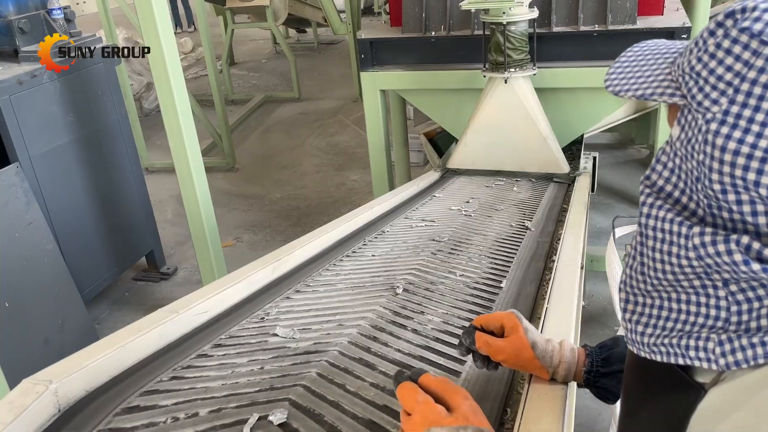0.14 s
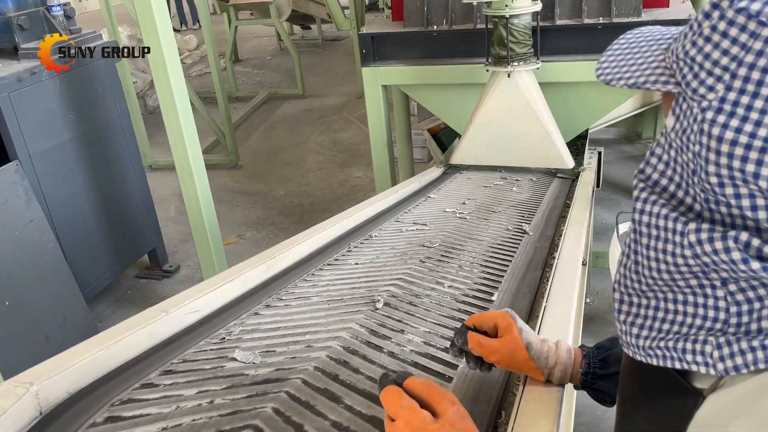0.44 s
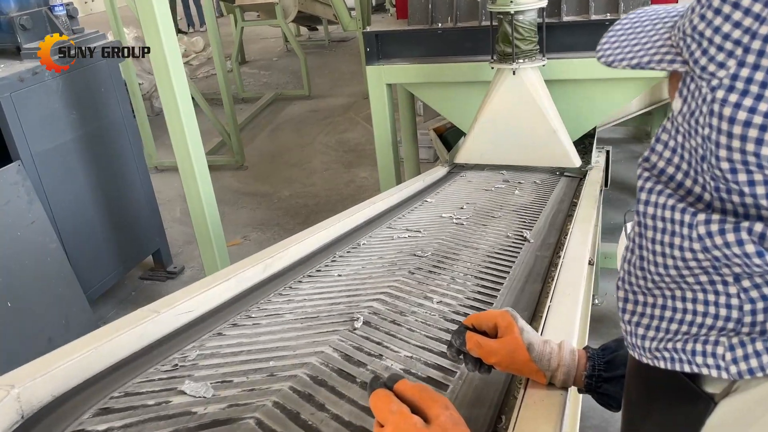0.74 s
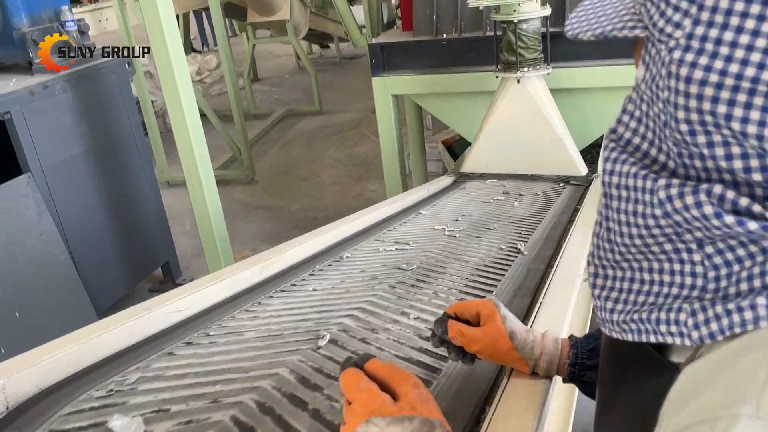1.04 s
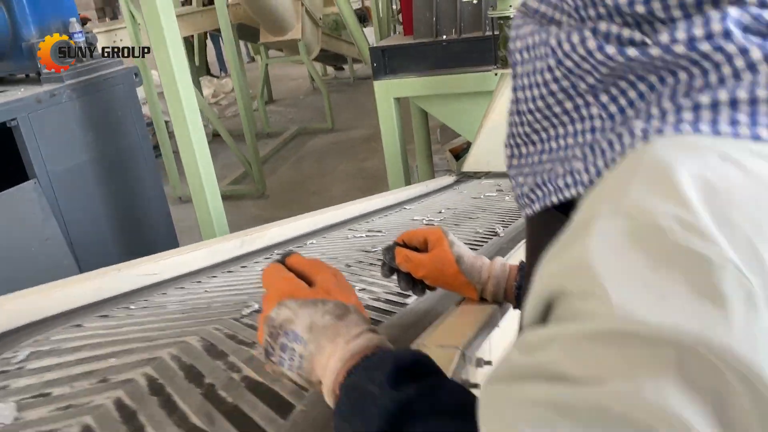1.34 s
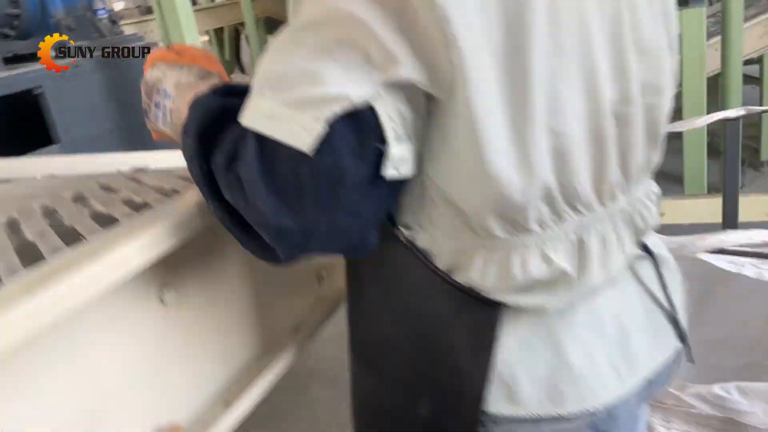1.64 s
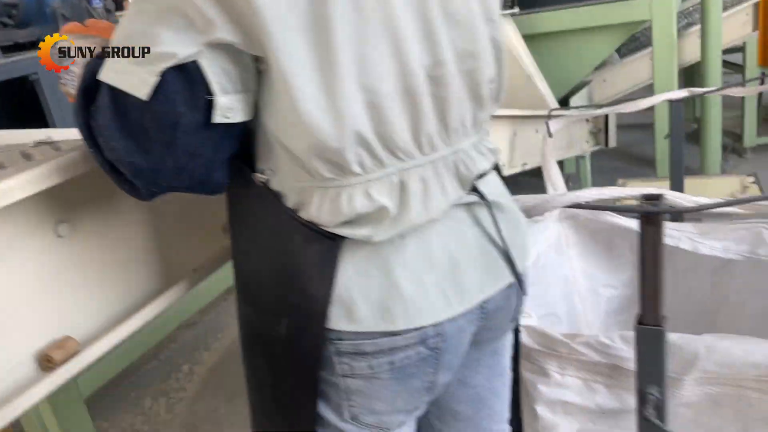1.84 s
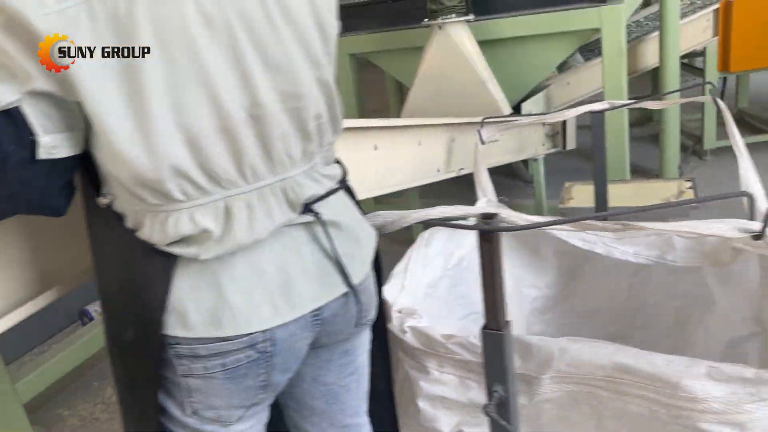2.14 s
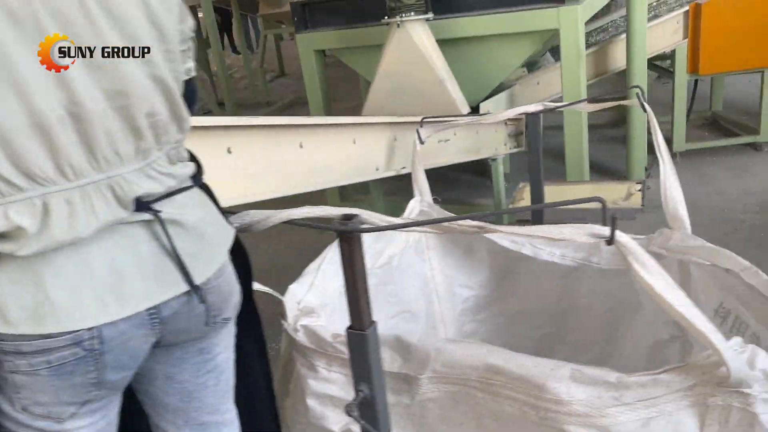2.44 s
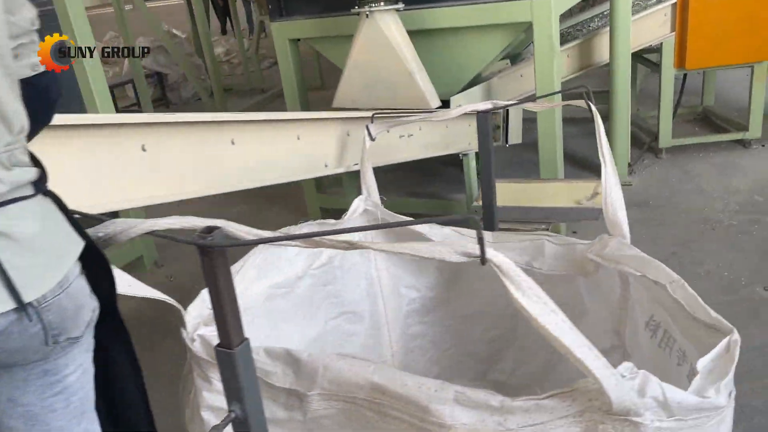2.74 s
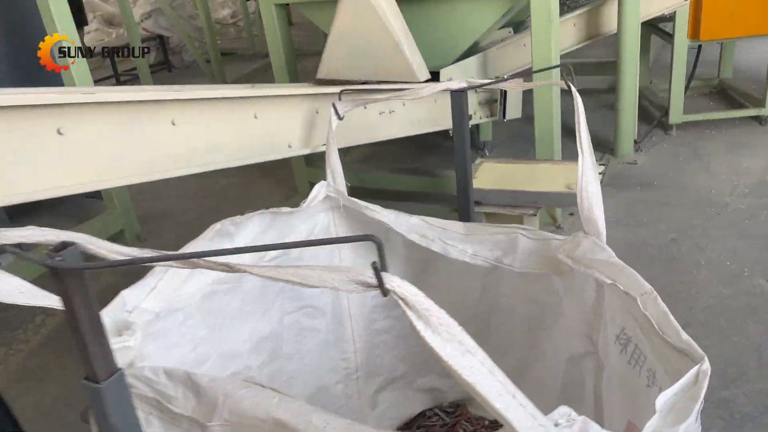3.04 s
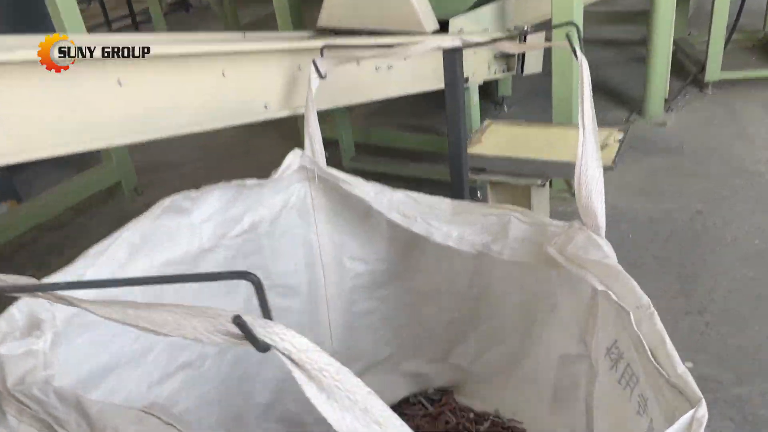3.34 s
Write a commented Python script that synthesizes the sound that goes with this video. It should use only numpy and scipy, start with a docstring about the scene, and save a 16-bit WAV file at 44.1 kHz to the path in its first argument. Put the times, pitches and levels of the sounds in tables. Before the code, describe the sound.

Shredded metal scrap clatters continuously in uneven bursts several times a second, with thin ringing clanks, over roaring fans and humming motors in a large industrial hall, heard in stereo by a nearby handheld microphone.

```python
"""Shredded scrap spills down steel chutes a few times a second: random hits excite short resonances.
Heavier chunks ring on at thin pitches; single clangs are decaying sines.
Behind them fans, belts and motors of a recycling hall roar (flickering coloured noise) and hum (narrow noise).
Two microphone ports share part of the sound, with a phase lead and level tilt set by frequency."""
import sys
import numpy as np
from scipy import signal
from scipy.fft import rfft, irfft
from scipy.io import wavfile

SR = 44100
rng = np.random.default_rng(int(sys.argv[2]) if len(sys.argv) > 2 else 0)


def store_pcm(level_fs):
    """Save levels as 16-bit WAV."""
    pcm = np.round(np.clip(level_fs, -1, 1) * 32767).astype(np.int16)
    wavfile.write(sys.argv[1], SR, np.atleast_2d(pcm).T)


N = 154350


def from_db(db):
    """Amplitude gain of a level in dB."""
    return 10 ** (np.asarray(db) / 20)


def rms_one(x):
    """Scale to unit power."""
    return x / np.sqrt(np.mean(x ** 2) + 1e-20)


def at_hz(points, hz):
    """Read a spectrum table, linear over log frequency."""
    table_hz, values = np.array(points).T
    return np.interp(np.log(hz + 1), np.log(table_hz), values)


def drift(corner_hz):
    """Slow random curve of spread 1: two-pole lowpassed noise, computed every 40 samples."""
    step = 40
    pole = np.exp(-2 * np.pi * corner_hz * step / SR)
    noise = rng.standard_normal(N // step + 2002)
    slow = signal.lfilter([1], [1, -2 * pole, pole ** 2], noise)[2000:]  # settled part
    return np.interp(np.arange(N) / step, np.arange(len(slow)), rms_one(slow))


def ring(x, hz, width_hz):
    """Two-pole resonance whose output power for noise is independent of its width."""
    radius, angle = np.exp(-np.pi * width_hz / SR), 2 * np.pi * hz / SR
    gain = np.sqrt(1 - radius ** 2)
    poles = [1, -2 * radius * np.cos(angle), radius ** 2]
    return signal.lfilter([gain, 0, -gain], poles, x + 1e-18)


# scrap spills: (time [s], clatter level [dB], sizzle re clatter [dB], clank re clatter [dB],
#                knock re clatter [dB], clatter rise constant [s], clatter fall T60 [s])
SPILLS = [(0.2982, -20, 3, 1.5, -5, 0.016, 0.81), (0.4394, -14.5, -2, -1, 4, 0.02, 0.57),
          (0.573, -15.5, 1, 5, 5, 0.012, 0.54), (0.6394, -22.5, 3, -6, 4, 0.044, 1),
          (0.8884, -14.5, -5, 1.5, 4, 0.018, 0.47), (0.9444, -23.5, 5, -8, 7.5, 0.022, 0.94),
          (1.075, -15, -12, 2.5, -8, 0.047, 0.95), (1.1994, -18, 2.5, -9, 6, 0.021, 0.38),
          (1.3894, -22, -3, 2, 8, 0.0098, 0.54), (1.4694, -15.5, -8, 3, -2.5, 0.056, 1),
          (1.6487, -17.5, 1, 5.5, 5.5, 0.036, 0.68), (1.7494, -19.5, -5, 2, -6, 0.013, 0.45),
          (1.9111, -14.5, -8, 4.5, -12, 0.02, 0.4), (2.1594, -17, -22, 6, 5.5, 0.056, 1),
          (2.2594, -18.5, 1, -7, -13, 0.022, 0.78), (2.3444, -21, 9.5, -12, -8, 0.015, 0.56),
          (2.492, -13, 1.5, 4, 4, 0.016, 0.58), (2.5344, -19, 3, 5, 0, 0.026, 0.94),
          (2.725, -14.5, 0.5, 2, 0.5, 0.009, 0.53), (2.7594, -23, -2, 6.5, -11, 0.032, 0.45),
          (3.021, -20.5, 2, 0, 4, 0.019, 0.85), (3.182, -14.5, 5, 2.5, -3, 0.019, 0.52),
          (3.2594, -18, -12, 3, 3, 0.013, 0.54)]
SPILL_OFFSET_DB, TRICKLE_DB = -9.5, -39  # added to every clatter level; floor that never stops
SIZZLE_HASTE, CLANK_HASTE = 3.0, 0.6  # rise speed re clatter; knock shares the clank's
CLUMP_DB, CLUMP_CORNER_HZ = 0.6, 19.0


def spill_force():
    """Strength of knock, clank, clatter, sizzle: spills rise and die away in the hall over a trickle."""
    t = np.arange(N) / SR
    power = np.full((4, N), from_db(TRICKLE_DB) ** 2)
    haste = np.array([[CLANK_HASTE], [CLANK_HASTE], [1], [SIZZLE_HASTE]])
    for start_s, clatter_db, sizzle_db, clank_db, knock_db, rise_s, t60_s in SPILLS:
        age = np.maximum(t - start_s, 0)
        zone_db = np.array([[knock_db], [clank_db], [0], [sizzle_db]])
        fall_db = 60 * age * haste ** 0.56 / t60_s
        level_db = clatter_db + SPILL_OFFSET_DB + zone_db - fall_db
        rise = 1 - np.exp(-age * haste / rise_s)
        power += (rise * from_db(level_db)) ** 2
    clumps_db = CLUMP_DB * np.array([drift(CLUMP_CORNER_HZ) for _ in power])
    return np.sqrt(power) * from_db(clumps_db)


# borders between knock, clank, clatter and sizzle: (frequency [Hz])
ZONES_HZ = [1200, 2700, 7500]
# scrap spectrum: (frequency [Hz], density [dB per Hz])
SCRAP_SPECTRUM = [(350, 3), (600, -2), (1000, 3.5), (2000, 4), (3500, 5.5), (5000, 3.5), (7000, -0.5),
                  (9500, -6), (12500, -40.5), (15500, -63)]
PIECES_PER_S, PIECE_SPREAD_DB = 20000, 2.5
PIECE_WIDTH_PER_HZ = 2.3 / 8.0  # resonance width over pitch


def scrap(force):
    """Small pieces hit at random; each rings a few cycles at one of 24 pitches. Two unrelated draws."""
    sizes_db = PIECE_SPREAD_DB * np.minimum(rng.exponential(1, (2, N)), 5)
    sizes = from_db(sizes_db) * rng.choice([-1, 1], (2, N))
    hits = rms_one((rng.random((2, N)) < PIECES_PER_S / SR) * sizes)
    pitches_hz = np.geomspace(350, 15500, 24)
    dealt = rng.integers(0, 24, (2, N))
    zones = np.searchsorted(ZONES_HZ, pitches_hz)
    out = 0
    for k, (hz, zone) in enumerate(zip(pitches_hz, zones)):
        band_db = at_hz(SCRAP_SPECTRUM, hz) + 10 * np.log10(hz / 4000)  # density to band level
        struck = force[zone] * hits * (dealt == k)
        out = out + from_db(band_db) * ring(struck, hz, PIECE_WIDTH_PER_HZ * hz)
    return out


# chunk spectrum: (frequency [Hz], gain [dB])
CHUNK_COLOUR = [(400, -6), (1000, -4.5), (1500, -2.5), (2500, -1), (4800, -1), (6000, -6)]
CHUNKS_PER_S, CHUNK_DB, CHUNK_SPREAD_DB = 600, -1, 4.2
CHUNK_WIDTH_HZ = 2.0 / 0.17


def chunks(force):
    """Heavier pieces and struck plates ring at 110 thin random pitches, in time with the spills."""
    sizes = from_db(CHUNK_SPREAD_DB * np.minimum(rng.exponential(1, (2, N)), 3))
    hits = rms_one(sizes * (rng.random((2, N)) < CHUNKS_PER_S / SR)) * from_db(CHUNK_DB)
    pitches_hz = 400 * 15 ** rng.random(110)  # 400-6000 Hz
    dealt = rng.integers(0, 110, (2, N))
    out = 0
    for k, hz in enumerate(pitches_hz):
        struck = force[np.searchsorted(ZONES_HZ, hz)] * hits * (dealt == k)
        out = out + from_db(at_hz(CHUNK_COLOUR, hz)) * ring(struck, hz, CHUNK_WIDTH_HZ)
    return out


# loudest single rings: (time [s], frequency [Hz], level before rise and decay [dB])
CLANGS = [(0.57, 882, -31), (0.89, 1507, -31), (0.89, 3962, -30), (1.81, 366, -22.5), (2.51, 1442, -22),
          (2.52, 1270, -30), (2.585, 990, -28), (2.72, 3208, -29), (2.74, 4780, -27), (2.77, 129, -22),
          (3.24, 1248, -29)]
CLANG_RISE_S, CLANG_T60_S = 0.0115, 0.41


def clangs():
    """Single pieces ring at one pitch: sines that swell briefly in the hall, then decay."""
    t, out = np.arange(N) / SR, 0
    turns = rng.random((len(CLANGS), 2))  # start phase in each draw
    for (start_s, hz, db), turn in zip(CLANGS, turns):
        age = np.maximum(t - start_s, 0)
        rise = (1 - np.exp(-age / CLANG_RISE_S)) ** 2
        envelope = rise * from_db(db - 60 * age / CLANG_T60_S)
        out = out + envelope * np.sin(2 * np.pi * (hz * age + turn[:, None]))
    return out


# bass level over time, with a low thump near 2.8 s: (time [s], deep bass level [dB], growl level [dB])
RUMBLE = [(0.0, -25.5, -30), (0.03, -36, -27), (0.61, -36, -28), (0.85, -31, -27.5), (0.95, -27.5, -26.5),
          (1.47, -33, -26.5), (1.6, -32.5, -28), (1.83, -30, -25.5), (2.1, -29.5, -29.5),
          (2.71, -32.5, -28), (2.84, -24, -24), (2.88, -33.5, -27.5), (3.1, -28.5, -31), (3.38, -33, -26),
          (3.5, -34, -34)]


def bass_swing(hz):
    """Bass swell in dB re its median: deep below 130 Hz, growl to 450 Hz, none above."""
    time_s, deep_db, growl_db = np.transpose(RUMBLE)
    db = deep_db if hz < 130 else growl_db
    return np.interp(np.arange(N) / SR, time_s, db - np.median(db)) * (hz < 450)


# fans, belts and frames: (frequency [Hz], density [dB per Hz])
ROAR_SPECTRUM = [(20, -31), (35, -13.5), (58, -4.5), (100, 0.5), (150, -3), (250, -3), (380, -7),
                 (520, -8.5), (1000, -11), (2000, -15.5), (4000, -20), (8000, -31), (15000, -43.5)]
ROAR_DB, FLICKER_DB, FLICKER_CORNER_HZ = -24.5, 0.71, 17.0  # roar level before flicker and swell


def roar():
    """Two draws of coloured noise in flickering octave bands; the bass wavers over time."""
    hz = np.fft.rfftfreq(N, 1 / SR)
    spectrum = rfft(rng.standard_normal((2, N))) * from_db(at_hz(ROAR_SPECTRUM, hz))
    spectrum = spectrum / np.sqrt(np.mean(irfft(spectrum, N) ** 2))
    out, octave = 0, np.log2(hz / 22 + 0.01)
    for centre in range(10):
        band = np.cos(np.pi / 2 * np.clip(octave - centre, -1, 1)) ** 2
        level_db = bass_swing(22 * 2 ** centre) + FLICKER_DB * drift(FLICKER_CORNER_HZ)
        out = out + from_db(level_db) * irfft(spectrum * band, N)
    return from_db(ROAR_DB) * out


# motors and gears: (frequency [Hz], width [Hz], level at median bass level [dB])
HUMS = [(69, 10, -38), (104, 12, -41), (148, 3, -35), (197, 10, -40), (355, 20, -45), (385, 14, -43),
        (1955, 6, -51), (2047, 5, -45)]


def hums():
    """Wavering motor and gear tones: noise through two narrow resonances; low ones follow the bass curve."""
    out = 0
    for hz, width_hz, db in HUMS:
        noise = rng.standard_normal((2, N + SR))
        tone = ring(ring(noise, hz, width_hz), hz, width_hz)[:, SR:]  # skip 1 s build-up
        out = out + from_db(db + bass_swing(hz)) * rms_one(tone)
    return out


# likeness of the ports: (frequency [Hz], coherence [0-1])
LIKENESS = [(60, .98), (250, .92), (600, .45), (1200, .35), (2000, .1), (3000, .4), (4000, .6), (5000, .45),
            (6200, .7), (7000, .65), (7900, .995), (8400, .995), (9000, .75), (10300, .7), (11100, .999),
            (12300, .999), (13000, .4), (14000, .95), (14400, .9995)]
# phase by which left leads: (frequency [Hz], lead [rad])
LEAD = [(60, 0), (250, -.1), (500, -.5), (1200, -.5), (1900, -2), (2500, .6), (2950, 1.2), (3900, 0),
        (5100, .8), (5700, 0), (6800, -1.1), (7800, -3), (8400, -3.2), (9800, -4.9), (11000, -6.28),
        (12300, -6.28), (13200, -8), (14000, -9.3), (14400, -9.42)]
# level difference: (frequency [Hz], left minus right [dB])
TILT = [(60, -3.2), (700, -3), (1230, -2), (2100, -1), (2600, 1), (3500, 2.5), (5000, 4.5), (6000, 2),
        (7600, 0), (15000, 0)]


def ports(shared, scattered):
    """Right port hears the left's sound phase-shifted, plus scattered sound of its own."""
    hz = np.fft.rfftfreq(N, 1 / SR)
    alike = np.clip(at_hz(LIKENESS, hz), 0, 1)
    tilt = from_db(at_hz(TILT, hz) / 2)  # half to each side
    left = rfft(shared)
    shifted = left * np.exp(-1j * at_hz(LEAD, hz))
    right = alike * shifted + np.sqrt(1 - alike ** 2) * rfft(scattered)
    return irfft(np.array([left * tilt, right / tilt]), N)


def scene():
    """Sum all sources as a shared and a scattered draw, heard through the two ports."""
    force = spill_force()
    shared, scattered = scrap(force) + chunks(force) + clangs() + roar() + hums()
    return ports(shared, scattered)


STOPBAND_HZ, STOPBAND_DB = 15900, 70


def record(dry):
    """Cut the top with a steep lowpass."""
    lowpass = signal.cheby2(20, STOPBAND_DB, STOPBAND_HZ, fs=SR, output="sos")
    return signal.sosfilt(lowpass, dry)


dry = scene()
out = record(dry)
store_pcm(out)
```